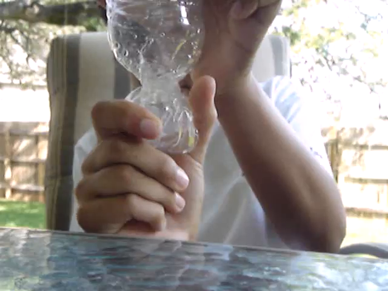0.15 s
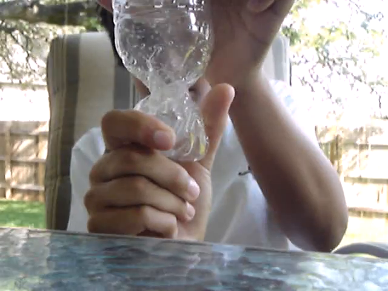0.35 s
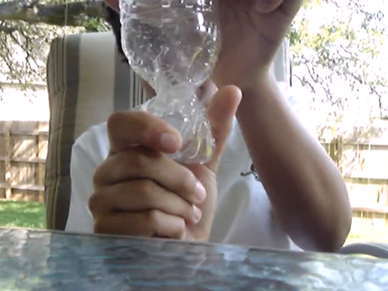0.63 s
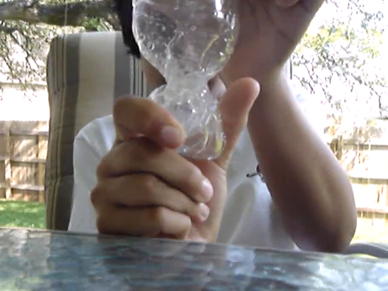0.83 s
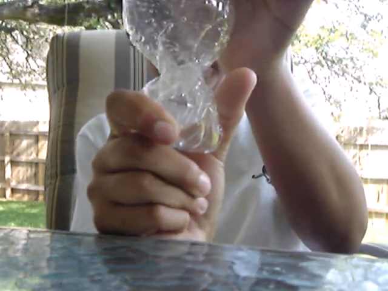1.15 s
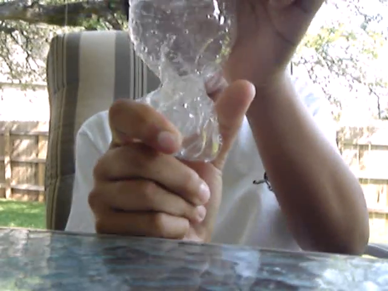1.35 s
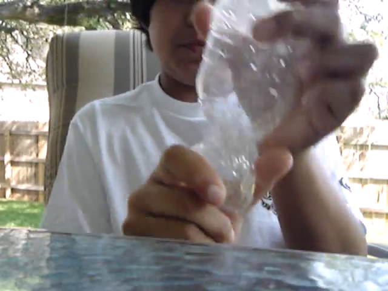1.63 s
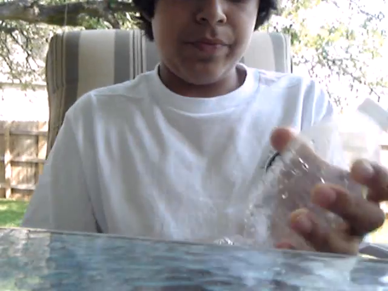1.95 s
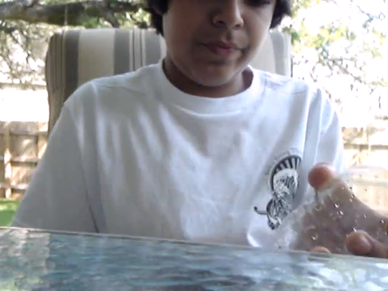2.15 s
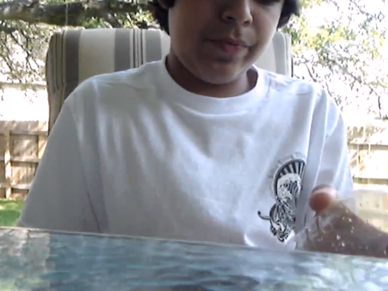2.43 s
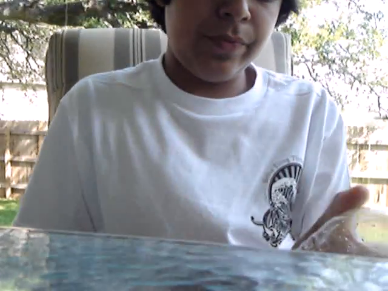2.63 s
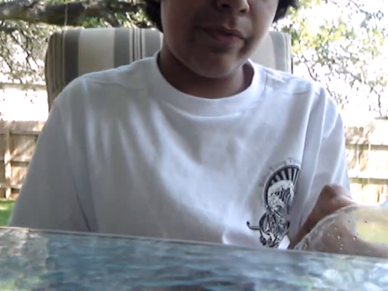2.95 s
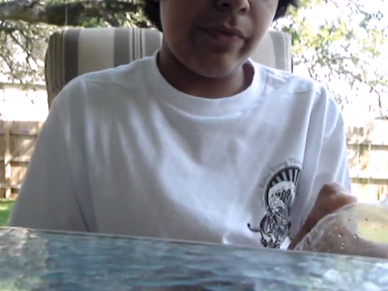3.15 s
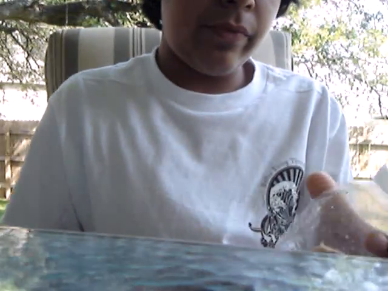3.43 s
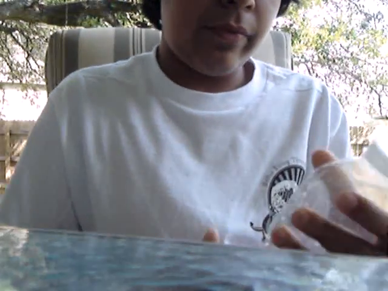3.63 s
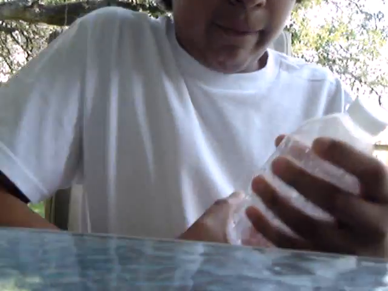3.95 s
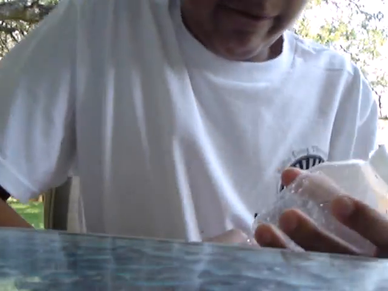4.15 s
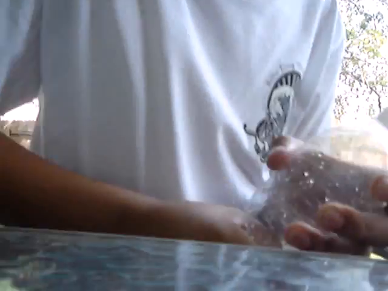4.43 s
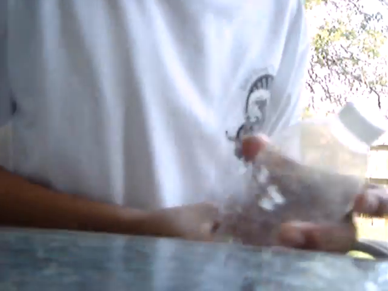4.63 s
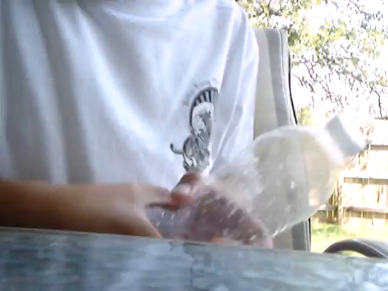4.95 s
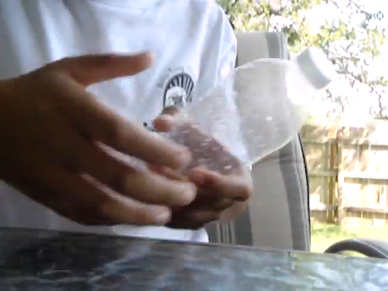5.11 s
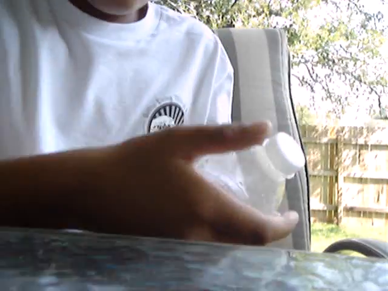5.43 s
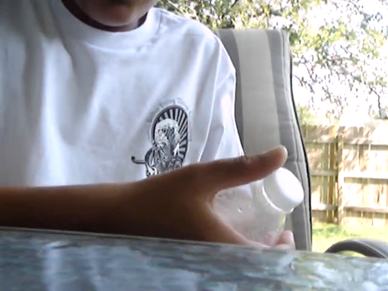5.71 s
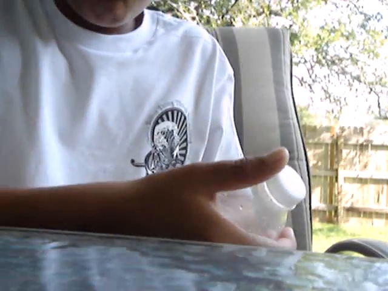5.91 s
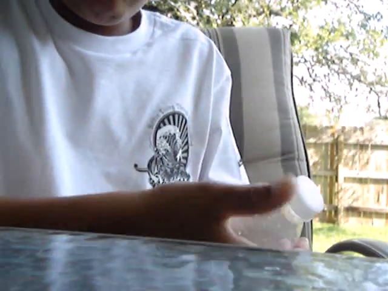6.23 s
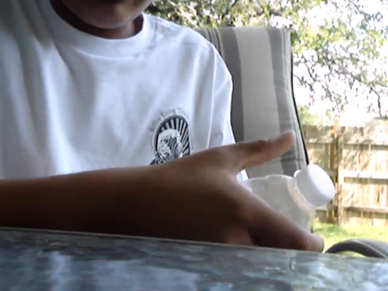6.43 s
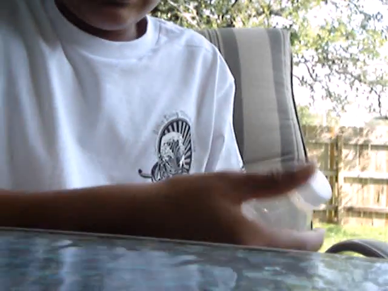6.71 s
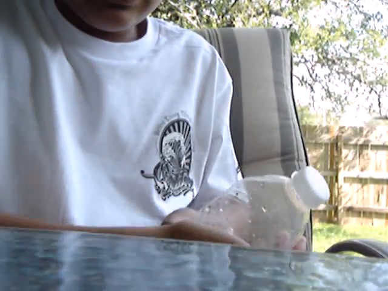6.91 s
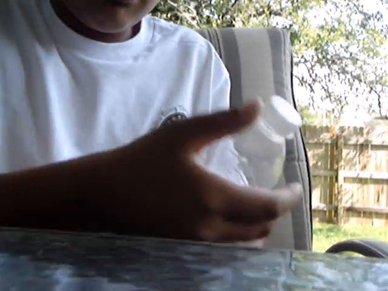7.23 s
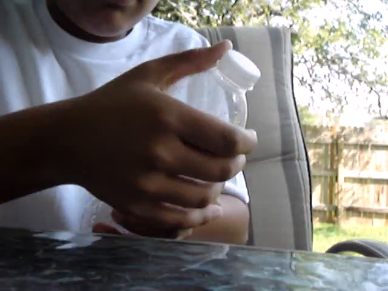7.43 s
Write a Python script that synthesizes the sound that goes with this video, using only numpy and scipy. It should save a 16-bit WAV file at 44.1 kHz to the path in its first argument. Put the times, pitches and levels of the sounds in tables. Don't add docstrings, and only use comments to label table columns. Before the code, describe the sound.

A thin empty plastic bottle is twisted, crackling and creaking in sharp irregular bursts, while a distant power hammer drums and wind buffets the microphone.

```python
import sys
import numpy as np
from scipy import signal
from scipy.io import wavfile
from scipy.ndimage import uniform_filter1d, minimum_filter1d

SR = 44100
rng = np.random.default_rng(int(sys.argv[2]) if len(sys.argv) > 2 else 0)


def volts_from_decibels(level):
    exponent = np.asarray(level, float) / 20
    return 10 ** exponent


def store_wav(level_fs):
    pcm = np.round(np.clip(np.atleast_2d(level_fs), -1, 1) * 32767)
    wavfile.write(sys.argv[1], SR, pcm.T.astype(np.int16))


N = 333820

# peak time in seconds, peak in dB, ring in Hz,
# treble share in dB.
UPRIGHT_SNAPS = [(0.147, -24.5, 4260, 7), (0.172, -24.5, 4460, 1.5), (0.221, -17.5, 2100, -0.5),
                 (0.237, -17.5, 2040, 0.5), (0.289, -14, 3200, -2), (0.3032, -12, 1770, -17),
                 (0.3522, -25.5, 2700, 6), (0.375, -25, 2730, 5), (0.3996, -14.5, 3960, -1.5),
                 (0.4252, -10.5, 3520, -6), (0.452, -4.5, 2420, -2), (0.495, -17.5, 2840, 1),
                 (0.507, -11.5, 3100, -6), (0.7936, -18, 3180, -2), (0.8115, -7.5, 2320, -3),
                 (0.8324, -13.5, 3500, -4), (0.8494, -12.5, 2270, -7), (0.9344, -17, 3240, -7.5),
                 (0.959, -24, 2580, 2.5), (1.2607, -22, 1990, 0), (1.284, -25, 4900, 14),
                 (1.3094, -7.5, 1600, -11), (1.3882, -10.5, 1610, -7.5), (1.4029, -6, 2450, -6),
                 (1.4204, -13, 1270, -5), (1.6567, -5.5, 3040, -11), (1.6772, -7, 1830, -16),
                 (1.8031, -9, 1950, -5.5), (1.807, -15, 1900, -13)]
# peak time in seconds, peak in dB, ring in Hz,
# treble share in dB.
MORE_UPRIGHT_SNAPS = [(0.3703, -13, 1700, -16), (0.3854, -26, 2390, -7), (0.4056, -11, 1700, -10),
                      (0.446, -24, 3290, -18.5), (0.4627, -25, 2410, -23), (0.4661, -20, 2350, 4),
                      (0.473, -21, 4030, -32), (0.477, -26.5, 4690, -15), (0.4862, -23, 2350, -4.0),
                      (0.786, -26.5, 3550, 5), (0.8032, -21, 3340, 3), (0.824, -23, 3360, 4),
                      (0.8381, -17, 3450, -12), (0.8524, -28.0, 1210, -11), (0.866, -17, 2060, -3),
                      (1.2935, -21, 1140, -12), (1.315, -15.5, 4090, -0.5), (1.3192, -17.5, 7100, -1),
                      (1.3254, -29, 2070, -26), (1.331, -15.5, 4110, -2), (1.3446, -11, 4100, -3),
                      (1.3504, -19, 6890, 1), (1.3572, -22, 4570, 5), (1.3833, -16, 1160, -20),
                      (1.4315, -18, 1360, -8), (1.4416, -22, 1290, -7), (1.4504, -13.5, 3290, -8),
                      (1.458, -19.5, 1680, 5), (1.462, -15.5, 1610, -2), (1.468, -22, 1420, -7.0),
                      (1.4749, -13.5, 1620, -3), (1.481, -25, 1160, -19.5)]
# peak time in seconds, peak in dB, ring in Hz,
# treble share in dB.
REGRIP_CRACKLE = [(1.6904, -10.5, 2060, -8), (1.7, -15.0, 1670, -6), (1.7066, -12, 4750, -21),
                  (1.7135, -17, 4750, -17), (1.718, -16, 4700, -15), (1.725, -15, 4750, -13),
                  (1.732, -16, 4700, -5), (1.739, -16.5, 3830, -8), (1.746, -15, 3640, -6),
                  (1.753, -21, 1700, -8.5), (1.7653, -25, 1570, -11), (1.7698, -33, 1590, -7),
                  (1.776, -15, 1830, -11), (1.7844, -23, 1610, -17), (1.79, -20.5, 1680, -24.0),
                  (1.796, -28, 1530, -31), (1.811, -19, 1590, -26), (1.8178, -29, 1530, -9),
                  (1.824, -24.0, 1590, -5), (2.0454, -20, 6330, -4), (2.051, -23, 6570, -2),
                  (2.059, -27, 3380, 3), (2.066, -22.5, 5530, 3.5), (2.0735, -21, 1940, 0),
                  (2.0812, -27, 2020, -14), (2.088, -23, 2020, 1.0), (2.1007, -21, 7000, -6),
                  (2.105, -21.5, 6290, 1), (2.1114, -18, 2320, -6.5), (2.1266, -20, 2110, 1),
                  (2.1352, -15, 1510, -9), (2.14, -17, 2190, -2), (2.1511, -19, 6700, -8),
                  (2.159, -23, 5530, -1.5), (2.1634, -27, 3620, -3.0), (2.169, -22.0, 1960, -7),
                  (2.175, -17, 1960, -7), (2.179, -19, 1110, -8)]
# peak time in seconds, peak in dB, ring in Hz,
# treble share in dB.
WRUNG_CRACKS = [(2.115, -23, 2150, 1), (2.119, -9.5, 1500, -9), (2.254, -8, 2413, -3.5),
                (2.2676, -15, 4790, -10), (2.5492, -17.5, 1210, -13), (3.029, -15.5, 4710, 1),
                (3.1576, -5, 2250, -2.5), (3.172, -10, 4950, -15), (3.3392, -11, 5020, -5),
                (3.4337, -4.5, 1690, -7.5), (3.4508, -9, 4450, -12), (3.4903, -5, 1300, -13),
                (3.5088, -1, 4000, -6), (3.5104, -3, 1970, -14), (3.5125, -6, 900, -22),
                (3.5217, -4.5, 3406, -15), (3.5302, -12, 4300, -9), (3.977, -2, 2210, -43),
                (4.375, -3, 2120, -7), (4.3965, -9, 1844, -40), (4.42, -16, 1300, -40),
                (4.425, 2.5, 1730, -21), (4.4437, -6, 5340, -3.5), (4.513, -8, 1920, -24),
                (4.5325, -0.5, 2337, -7.5), (4.5478, -9.5, 4200, 1), (4.6994, -3.5, 1098, -20),
                (4.703, -8, 800, -17), (4.7075, -5.5, 5170, -6), (4.721, -17, 4430, 4),
                (4.725, -2.5, 2500, -3), (4.7577, 3.5, 1578, -23), (4.7619, -2.5, 2440, -9)]
# peak time in seconds, peak in
# dB, ring in Hz, treble share in dB.
NECK_NOTCHES = [(2.826, -21, 2094, -4), (2.8315, -17, 2170.0, -5), (2.8359, -20, 6050.0, -6),
                (2.843, -19.0, 1940.0, -5), (2.8464, -20, 6070.0, -2), (2.8525, -17, 2070.0, -2),
                (2.859, -19.5, 6200.0, -2), (2.8672, -16, 6140.0, -14), (2.873, -23, 1340.0, -6),
                (2.8806, -16, 5800, -9), (2.8884, -27, 2240.0, -4), (2.897, -26, 2150.0, 2),
                (2.9062, -25, 1250.0, -2), (2.9178, -18, 3900, -1), (2.9307, -19, 1590.0, -3),
                (2.9458, -14.5, 5840, -10), (2.9643, -14.5, 6050, -15), (3.1013, -16, 4460.0, -5),
                (3.117, -18, 3940, -0.5), (3.1357, -19.5, 2200.0, 4), (3.1505, -16.5, 4660, -2.5),
                (3.1763, -16, 4630.0, -6.5), (3.182, -15, 6200, -8), (3.1922, -14, 5680.0, -8),
                (3.2032, -16, 2240.0, -5), (3.211, -17, 5545, -5), (3.216, -17, 5750.0, -5),
                (3.222, -18, 1680.0, -5), (3.2272, -16, 6050.0, -9), (3.235, -15, 5900.0, -8),
                (3.245, -16, 5870, -10), (3.2537, -22, 5680.0, -5), (3.2616, -24, 6050.0, -4),
                (3.2691, -20, 5880, -2), (3.276, -24, 1760, -2), (3.28, -22, 4440.0, -1)]
# peak time in seconds, peak in dB, ring in Hz, treble share
# in dB.
SMALL_CREASES = [(3.458, -16, 2670, -1), (3.4639, -18, 2090, 3), (3.4707, -17.5, 2137, -5),
                 (3.361, -10, 3012, 0), (3.3335, -19, 3000, -4), (3.505, -9, 1494, -27),
                 (3.5345, -23, 3230, -13), (3.543, -14, 2730, -6), (3.5486, -22, 4190, -7),
                 (4.48, -15.5, 2760, -4.0), (4.4922, -17.5, 4330, -5.0), (4.612, -16, 2440, -10),
                 (4.657, -24, 2000, 0), (4.768, -7, 1120, -19.0)]
# peak time in seconds, peak in dB, ring in Hz, treble
# share in dB.
SETTLING_TICKS = [(1.991, -30.5, 5000, 7), (3.657, -24, 3140, -23), (3.704, -21.5, 3180, -27),
                  (3.753, -25, 3060, -20), (3.912, -34.5, 1300, 5.5), (4.852, -23, 4660, -3),
                  (6.607, -40, 5400, -2), (2.597, -25.5, 4860, 2.5), (6.832, -30, 4760, 5.5),
                  (6.84, -28.5, 4740, 1.5), (7.338, -34, 6360, -1.5), (7.359, -34.5, 6460, 1.5)]

# (time in seconds, effort in dB).
NECK_TURNS = [
    (9.5, [(.36, -57.5), (.46, -46), (.52, -45.5), (.58, -62)]),
    (-4.5, [(.79, -47), (.83, -38), (.88, -43)]),
    (-7, [(1.3, -42), (1.42, -43), (1.47, -31.5), (1.5, -39.5)]),
    (-25, [(1.7, -31), (1.75, -26.5), (1.79, -35.5), (1.81, -29), (1.87, -87)]),
    (2.5, [(1.98, -49.5), (2.025, -29.5), (2.08, -54), (2.125, -34), (2.18, -35), (2.24, -38), (2.275, -34.5), (2.33, -51.5), (2.4, -49)]),
    (1.5, [(2.54, -46), (2.58, -57), (2.61, -39.5), (2.7, -40.5), (2.82, -37.5), (2.86, -44), (2.9, -45), (2.98, -45.5)]),
]
# (time in seconds, effort in dB).
HARD_TURNS = [
    (8, [(3.16, -39), (3.25, -38.5), (3.32, -31), (3.38, -24.5), (3.39, -32.5)]),
    (-2.5, [(3.41, -38), (3.45, -27), (3.48, -30.5), (3.5, -40.5), (3.515, -21.5), (3.56, -26.5), (3.6, -35.5), (3.68, -52)]),
    (-14, [(3.995, -55), (4.06, -57), (4.15, -57)]),
    (0.5, [(4.43, -28), (4.455, -27.5), (4.51, -31), (4.56, -28), (4.63, -39.5), (4.66, -37.5), (4.69, -33)]),
    (1, [(4.69, -43), (4.705, -45), (4.735, -31), (4.77, -30), (4.82, -40), (4.87, -39.5), (5.0, -46)]),
    (-4.5, [(6.8, -47), (6.836, -42), (6.85, -47)]),
]
# time in seconds, slip rate in Hz, irregularity from 0 to 1.
SLIP_RATE = [(0, 250, 0.5), (1.68, 158.4, 0.36), (1.86, 150, 0.3), (2.0, 897, 0.62), (2.6, 896.6, 0.46),
             (2.8, 300.6, .2), (2.87, 149.7, 0.17), (3.15, 120.6, 0.34), (3.25, 217.3, 0.33),
             (3.33, 503, .22), (3.36, 1350, 0.07), (3.383, 1400, 0.09), (3.39, 994, 0.51), (5.1, 992, 0.65)]
# centre in Hz, width in Hz, level in dB.
WALL_MODES = [(1714, 950, 9.5), (3550, 1110, 9), (4910, 1330, 5), (6380, 4800, -4.5), (8050, 4100, -22.5)]
# start in seconds, end in seconds, centre in Hz, width in Hz, level in dB.
TAUT_PANELS = [(1.752, 1.86, 1680, 500, -34), (2.1, 2.183, 1030, 650, -27), (2.66, 2.92, 5830, 530, -36),
               (3.984, 4.016, 2390, 500, -35.5), (2.32, 3.22, 1300, 120, -43),
               (3.166, 3.33, 5500, 710, -43), (4.848, 4.98, 8200, 260, -40), (4.55, 4.7, 5500, 2500, -42)]

# first blow in seconds, end in seconds, blow rate in Hz, clang over drum in dB.
HAMMER_BURSTS = [
    (0.034, 1.64, 22, -6.5),
    (2.303, 3.82, 22.18, -2),
    (4.587, 6.42, 22.15, -5),
    (7.253, 7.6, 22.35, -5),
]
# time in seconds, level in dB.
HAMMER_FORCE = [(0, -41.5), (.4, -41), (1.3, -39), (1.7, -38), (2.3, -45.5), (2.55, -40), (3.15, -37),
                (3.75, -40.5), (4.6, -37.5), (5.1, -34.5), (5.3, -31), (5.45, -34.5), (6.0, -35.5),
                (6.4, -36.5), (7.25, -50), (7.38, -47), (7.43, -40), (7.57, -34)]
# centre in Hz, width in Hz, level in dB.
DRUM_MODES = [(371.3, 12.1, 7.5), (438, 10.6, 6), (503, 31, 0), (584, 57, 0.5), (250, 17.3, -3.5),
              (115.3, 26, -8), (800, 260, -13.5)]
# centre in Hz, width in Hz, level in dB.
CLANG_MODES = [(1182, 316, 10), (1400, 280, 13.5), (2150, 2110, 6.5), (2670, 660, 6), (3580, 1700, -21)]
# centre in Hz, width in Hz, level in dB.
STEEL_MODES = [(1126, 29, 15.5), (1300, 29, 9.5), (2109, 40, 12.5), (2320, 60, 0), (2714, 48, 5),
               (3125, 34, -1.5), (4090, 33, -1.5)]
# time in seconds, lag in seconds.
GROUND_LAG = [(0, 0.000935), (4.9, 0.001044), (5.4, 0.001007), (5.8, .0008), (6.0, 0.00115), (7.6, 0.00117)]

# strongest moment in seconds, buffet in dB, dying length in seconds.
WIND_GUSTS = [(.08, -46, 0.14), (1.5, -45.5, 0.17), (1.8, -33.5, 0.096), (2.2, -40, 0.23),
              (2.41, -30, 0.11), (2.56, -42, 0.057), (2.9, -36.5, 0.28), (3.15, -38, 0.13),
              (3.6, -39.5, 0.097), (3.73, -27, 0.05), (3.85, -42, 0.11), (4.3, -30.5, 0.13),
              (4.7, -33.5, 0.18), (4.969, -23, 0.054), (5.35, -24, 0.14), (5.5, -32, 0.14),
              (5.67, -25.5, 0.019), (5.88, -30.5, 0.15), (6.16, -32, 0.068), (6.35, -51, 0.2),
              (6.77, -48, 0.064), (7.27, -37.5, 0.062)]
# time in seconds, peak in dB, pitch in Hz.
PORT_EDDIES = [(1.929, -19, 185), (2.3606, -6.5, 246), (2.3758, -11, 290), (2.4044, -14, 292),
               (2.4125, -9.5, 240), (2.5754, -6.5, 205), (2.9431, -14.5, 392), (3.0786, -11, 406),
               (3.1249, -17, 369.7), (3.303, -13.5, 370.4), (3.3983, -17, 414), (3.51, -18, 330),
               (3.73, -9, 330), (3.7388, -3.5, 246), (3.879, -15.5, 182), (3.909, -18.5, 319),
               (4.1969, -14.5, 197), (4.264, -11.5, 276), (4.404, -7, 171), (4.407, -5.5, 343),
               (4.401, -7.5, 350), (4.419, -11, 330), (4.481, -17, 181), (4.64, -17, 520),
               (4.665, -22, 481), (4.712, -5, 561), (4.772, -10, 603), (4.7817, -12, 310),
               (4.849, -4.5, 275.5)]
# time in seconds, peak in dB, pitch in Hz.
SQUALL_EDDIES = [(4.94, -4, 278), (4.9497, -2, 430), (4.9579, -2.5, 437), (4.963, -5, 283),
                 (4.9734, -4, 250), (4.9876, 0, 250), (5.098, -1, 315), (5.143, -9, 250), (5.164, 0, 310),
                 (5.1816, 0, 472), (5.1913, -0.5, 376), (5.2756, -1, 400), (5.322, -0.5, 420),
                 (5.361, -0.5, 324), (5.373, 1.5, 290), (5.384, 3.5, 422), (5.462, -5.5, 385),
                 (5.5921, -15, 503), (5.6524, -9.5, 233), (5.6754, -7, 328), (5.745, -9, 285),
                 (5.868, -18, 169), (5.956, -14, 410), (6.1643, -9, 250)]
# time in seconds, peak in dB, pitch in Hz.
SOFT_EDDIES = [(1.746, -21, 150), (1.797, -13, 208), (1.83, -19, 250), (1.863, -21.5, 172)]
# frequency in Hz, level in dB per Hz.
GARDEN_SPECTRUM = [(25, -24.5), (128, -11.5), (302, -0.5), (418, 3.5), (889, -1.5), (6650, -26),
                   (10200, -24.5), (13300, -43)]


def unit(x):
    return x / np.sqrt(np.mean(x ** 2))


def curves(table):
    s, *columns = np.transpose(table)
    return [np.interp(np.arange(N) / SR, s, c) for c in columns]


def band(x, lo_hz, hi_hz, order=2):
    edges = [lo_hz, min(hi_hz, .45 * SR)]
    return signal.sosfilt(signal.butter(order, edges, "band", fs=SR, output="sos"), x)


def body(x, modes):
    out = 0
    for k, (hz, width, db) in enumerate(modes):
        out = out + (-1) ** k * volts_from_decibels(db) * signal.lfilter(*signal.iirpeak(hz, hz / width, SR), x)
    return out


def walk(rate):
    hold = int(SR / rate)
    steps = np.repeat(rng.standard_normal(N // hold + 1), hold)
    return unit(uniform_filter1d(steps, hold)[:N])


def add(out, s, grain):
    i = int(s * SR)
    out[i:i + len(grain)] += grain[:max(N - i, 0)]


def snaps(rise_s=0.00051, fall_s=0.0015, tail_s=0.0012, tail_db=-18, ring_width_hz=500):
    out = np.zeros(N)
    t = np.arange(1500) / SR - .004
    fall = np.exp(-t / fall_s) + volts_from_decibels(tail_db) * np.exp(-t / tail_s)
    shape = np.where(t < 0, np.exp(t / rise_s), fall)
    ring_shape = np.where(t < 0, np.exp(t / 0.0001), np.exp(-np.pi * ring_width_hz * t))
    folds = UPRIGHT_SNAPS + WRUNG_CRACKS + SETTLING_TICKS + MORE_UPRIGHT_SNAPS
    folds = folds + REGRIP_CRACKLE + NECK_NOTCHES + SMALL_CREASES
    for s, db, hz, treble_db in folds:
        noise = rng.standard_normal((2, 1500)) * shape
        ring = np.sin(2 * np.pi * hz * t) * ring_shape
        dull = band(noise[0], 775, 3670, order=3)
        bright = band(noise[1], 4180, 10250) + body(noise[1], [(4650, 830, 0.91), (6050, 320, 8.0)])
        crack = volts_from_decibels(-6.5) * dull / np.abs(dull).max() + ring
        treble = bright / np.abs(bright).max()
        add(out, s + t[0], volts_from_decibels(db - 1.5) * crack + volts_from_decibels(db + treble_db) * treble)
    return out


def even(x):
    return x / np.sqrt(uniform_filter1d(x ** 2, size=1500) + 1e-9)


def creak(scatter_db=3.0, smear_s=0.0056, rub_db=-4, patchy_db=1.84, jerk_db=2.4):
    hz, loose = curves(SLIP_RATE)
    jerk = volts_from_decibels(jerk_db * loose * walk(140))
    cycles = np.cumsum(hz * np.exp(loose * walk(900))) / SR
    slips = np.diff(np.floor(cycles), prepend=0) * volts_from_decibels(scatter_db * 2 * loose * walk(900))
    decay = np.exp(-1 / (smear_s * SR))
    burst = signal.lfilter([1], [1, -decay], slips) * rng.standard_normal(N)
    rub = volts_from_decibels(rub_db) * loose * rng.standard_normal(N)
    drive = jerk * (even(2 * loose * even(burst) + (1 - loose) * even(slips)) + rub)

    wall = volts_from_decibels(-23.0) * drive
    for k, mode in enumerate(WALL_MODES):
        wall = wall + volts_from_decibels(patchy_db * walk(40)) * body(drive, [mode]) * (-1) ** min(k, 2)
    high = unit(band(wall, 4320, 11200, order=1))
    low = unit(band(wall, 670, 5740))

    out = np.zeros(N)
    for bright_db, turn in NECK_TURNS + HARD_TURNS:
        effort = [(turn[0][0] - .03, -100)] + turn + [(turn[-1][0] + 0.31, -100)]
        out += volts_from_decibels(curves(effort)[0]) * (low + volts_from_decibels(bright_db) * high)
    for start, end, panel_hz, width, db in TAUT_PANELS:
        touch = drive[int(start * SR):int(end * SR)]
        song = unit(body(touch, [(panel_hz, width, 0)]))
        add(out, start, volts_from_decibels(db) * song * np.sqrt(np.hanning(len(touch))))
    return out


def hammer(hold_s=0.0089, fall_s=0.019, plateau=0.5, crack_db=4.0, crack_s=0.002, wall_s=0.0092,
           uneven_db=1.0, blow_db=-2.5, bite_db=1.5, bite_at=0.31):
    t = np.arange(int(.15 * SR)) / SR
    slap = np.exp(-t / crack_s) + (t > wall_s) * np.exp(-np.abs(t - wall_s) / crack_s)
    shape = np.exp(-np.maximum(t - hold_s, 0) / fall_s) + plateau * np.exp(-t / 0.24)
    shape = shape + volts_from_decibels(crack_db) * slap

    blows, spread = np.zeros(N), np.zeros(N)
    force_db, = curves(HAMMER_FORCE)
    clang_db = np.full(N, -8.)
    for start, end, hz, db in HAMMER_BURSTS:
        i, j = int(start * SR), min(int(end * SR), N)
        progress = np.arange(N - i) / (j - i)
        clang_db[i:] = db + np.interp(progress, [0, bite_at, 1], [0, bite_db, -bite_db])
        for s in np.arange(start, end, 1 / hz):
            strength = volts_from_decibels(uneven_db * rng.standard_normal())
            add(blows, s + 0.001202, strength * np.ones(1))
            add(spread, s + 0.001213, strength * shape * rng.standard_normal(len(t)))

    drum = body(volts_from_decibels(blow_db) * unit(blows) + unit(spread), DRUM_MODES)
    direct = blows + np.roll(blows, int(wall_s * SR))
    clang = body(spread + volts_from_decibels(26.5) * direct, CLANG_MODES + STEEL_MODES)
    clang = band(clang + volts_from_decibels(-9.5) * np.roll(spread, 400), 630, 4870, order=3)
    lag_s, = curves(GROUND_LAG)
    clang = clang + 0.21 * np.interp(np.arange(N) - lag_s * SR, np.arange(N), clang)
    return volts_from_decibels(force_db + 2.0) * unit(drum) + volts_from_decibels(force_db + clang_db) * unit(clang)


def wind(flutter_db=4.0, grow=0.95, stop=0.53, drop_db=6, rise=0.73, calm_db=-57):
    t = np.arange(N) / SR
    levels = []
    for s, db, length in WIND_GUSTS:
        levels.append(db - drop_db * np.maximum(t - s, (s - t) / rise) / length)
    gust = volts_from_decibels(np.max(levels, axis=0).clip(calm_db))
    rumble = unit(band(rng.standard_normal(N), 115.0, 360))
    out = gust * volts_from_decibels(-2.0 + flutter_db * walk(35)) * rumble
    for s, db, hz in PORT_EDDIES + SQUALL_EDDIES + SOFT_EDDIES:
        cycle = np.arange(-1500, 800) * hz / SR
        shape = np.exp(-(cycle / np.where(cycle < 0, grow, stop)) ** 2)
        eddy = shape * np.cos(2 * np.pi * (cycle + rng.random()))
        add(out, s - 1500 / SR, volts_from_decibels(db - 7.5) * eddy)
    return out


def garden(level_db=-38.5):
    table_hz, table_db = np.transpose(GARDEN_SPECTRUM)
    out, swell = 0, walk(7.7)
    for hz in 30 * 2 ** np.arange(0, 8.6, .5):
        db = np.interp(np.log(hz), np.log(table_hz), table_db) + 0.16 * swell + 1.42 * walk(13)
        out = out + volts_from_decibels(db) * band(rng.standard_normal(N), hz / 2 ** 0.34, hz * 2 ** 0.31)
    return volts_from_decibels(level_db) * unit(out)


def scene():
    return (snaps() + creak() + hammer() + wind() + garden())[None]


def gate_treble(x, depth_db=-14, from_hz=3000, mask_db=-48):
    f, _, cells = signal.stft(x, SR, nperseg=256)
    power = uniform_filter1d(np.abs(cells) ** 2, size=4, axis=0)
    power = uniform_filter1d(power, size=2, axis=1)
    loudest = -minimum_filter1d(-power, size=17, axis=1)
    luck = np.kron(rng.standard_normal((33, 700)), np.ones((4, 4), int))[:129, :cells.shape[1]]
    slack = (1 + np.maximum(2 * from_hz / (f + 1) - 1, 0) ** 2)[:, None]
    heard = power > loudest * volts_from_decibels(2 * (depth_db + 3 * luck[:, ::-1]) * slack)
    smooth = uniform_filter1d(power, size=6, axis=1)
    masked = smooth < smooth.max(axis=0) * volts_from_decibels(2 * (mask_db + 6 * luck))
    masked = masked & (f > 4200)[:, None]
    return signal.istft(cells * (heard & ~masked), SR)[1][:N]


def roll_off(x):
    return signal.sosfilt(signal.butter(12, 15800, fs=SR, output="sos"), x)


def record(dry):
    low_pass = signal.ellip(10, .1, 55, 10000, fs=SR, output="sos")
    x = signal.sosfiltfilt(low_pass, gate_treble(dry[0]))
    return roll_off(np.clip(x, -.73, .73)[None])


dry = scene()
out = record(dry)
store_wav(out)
```